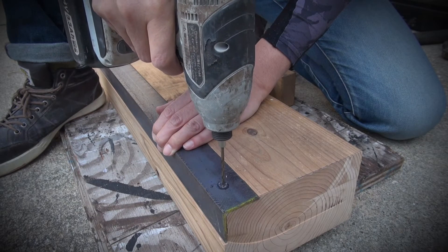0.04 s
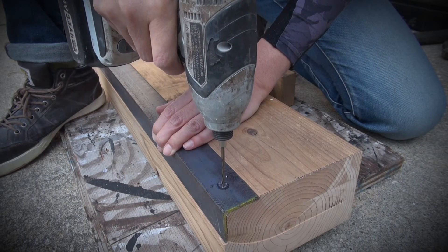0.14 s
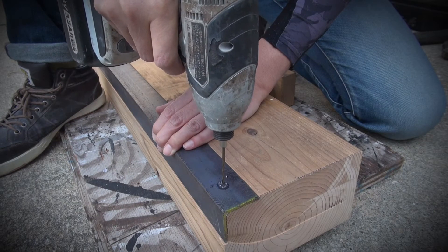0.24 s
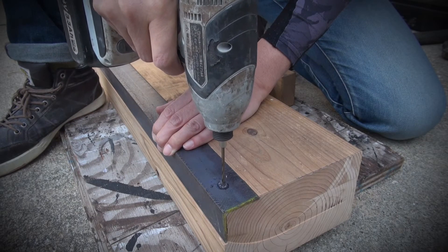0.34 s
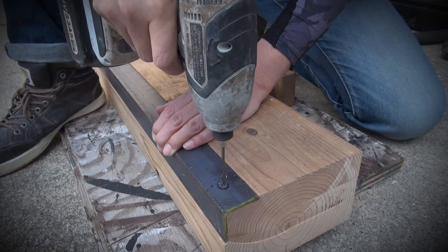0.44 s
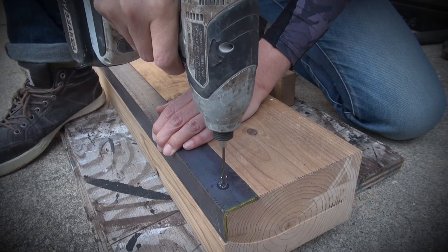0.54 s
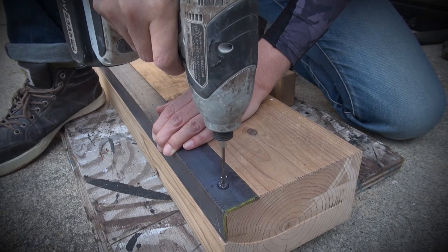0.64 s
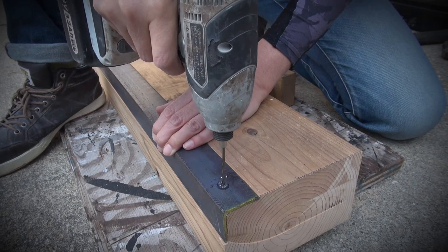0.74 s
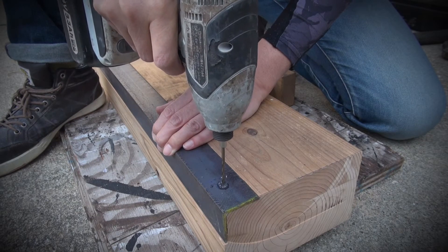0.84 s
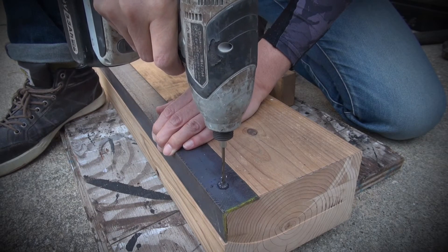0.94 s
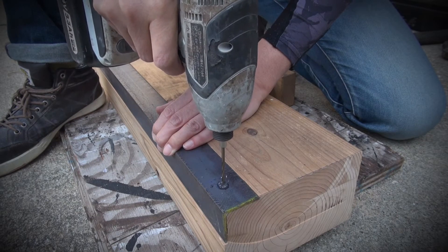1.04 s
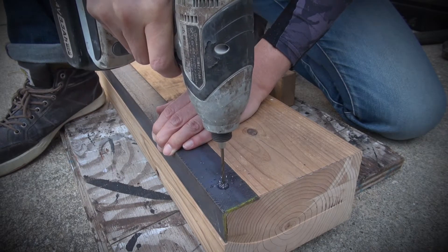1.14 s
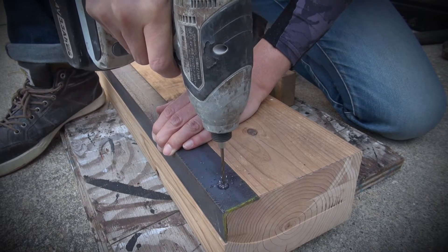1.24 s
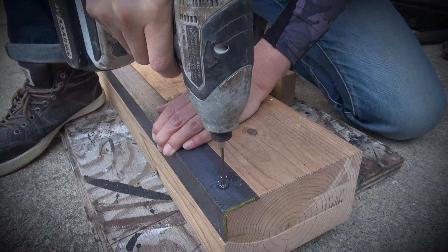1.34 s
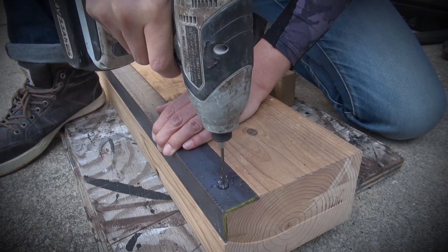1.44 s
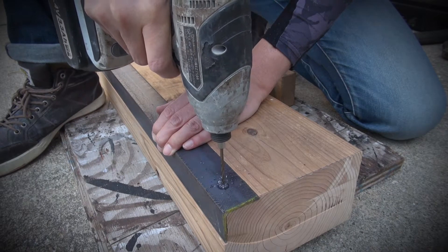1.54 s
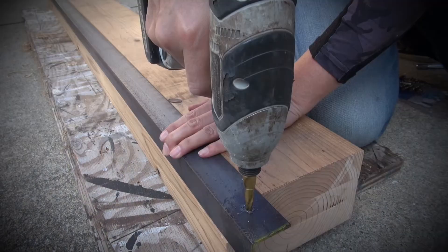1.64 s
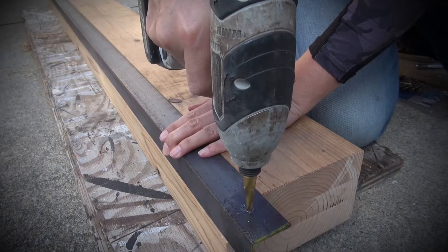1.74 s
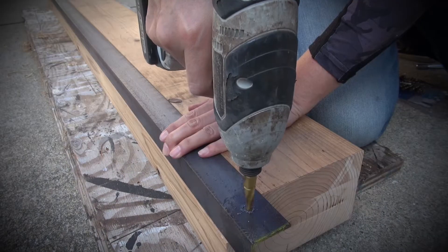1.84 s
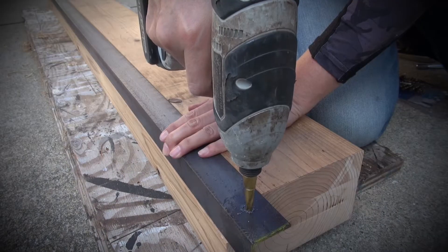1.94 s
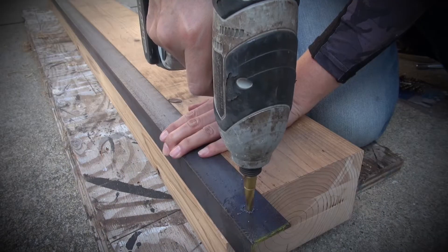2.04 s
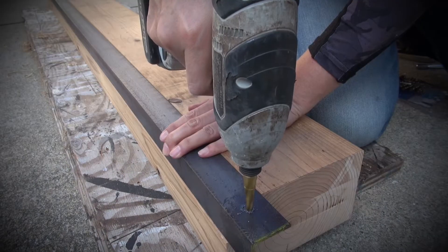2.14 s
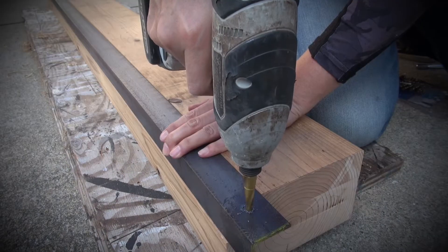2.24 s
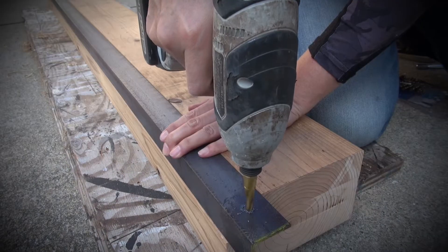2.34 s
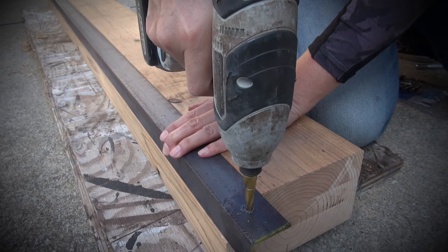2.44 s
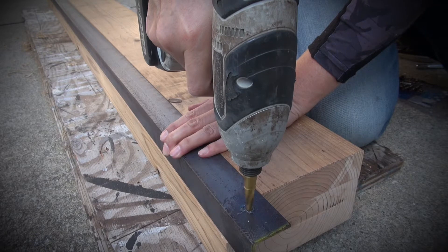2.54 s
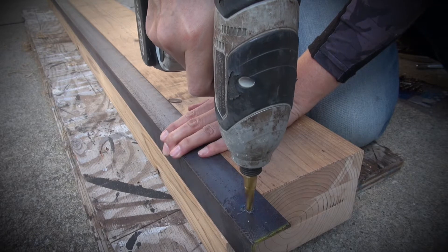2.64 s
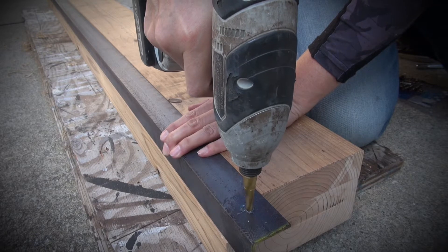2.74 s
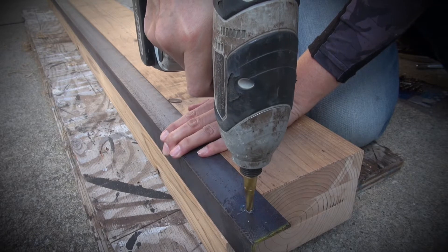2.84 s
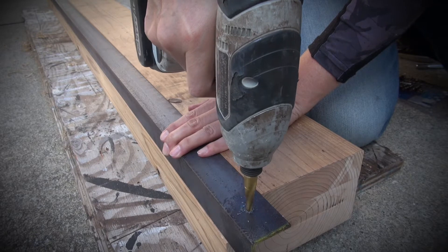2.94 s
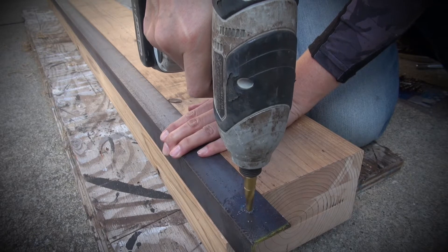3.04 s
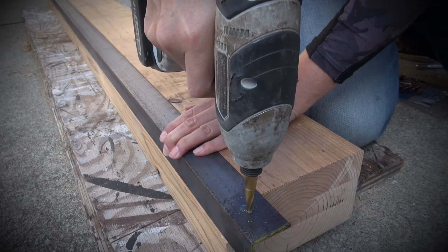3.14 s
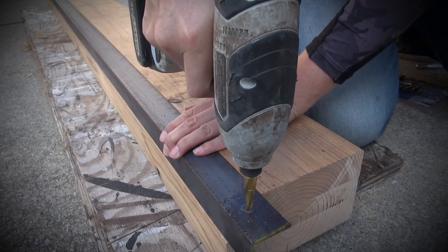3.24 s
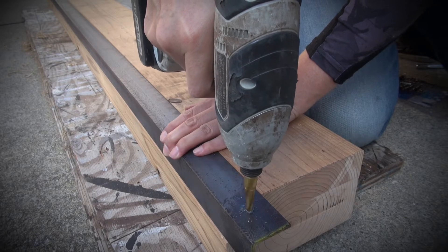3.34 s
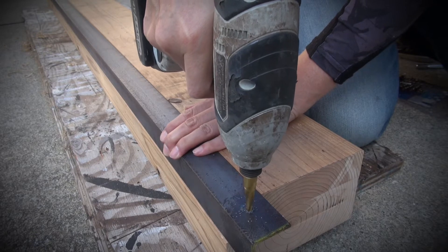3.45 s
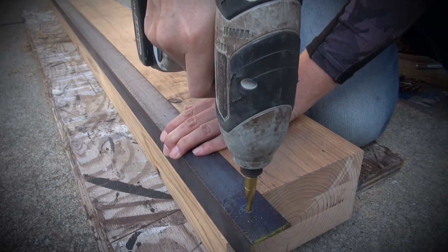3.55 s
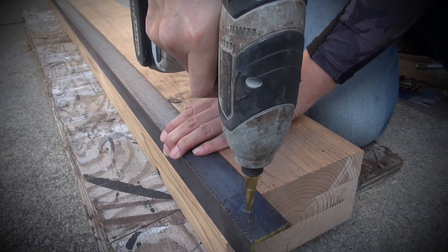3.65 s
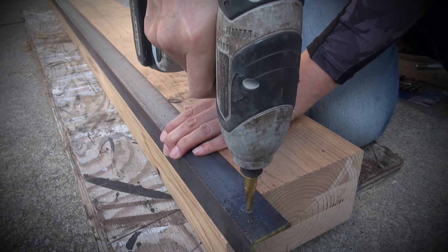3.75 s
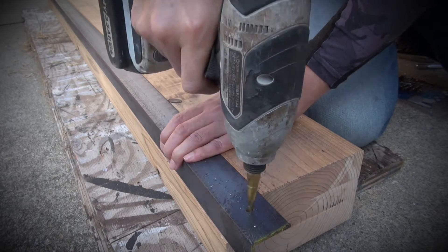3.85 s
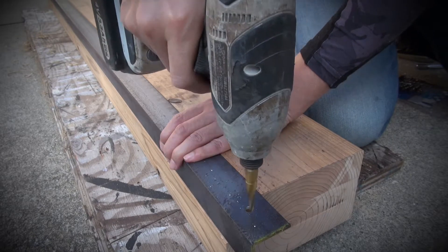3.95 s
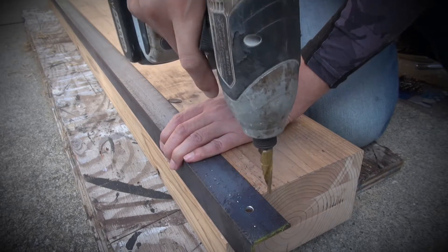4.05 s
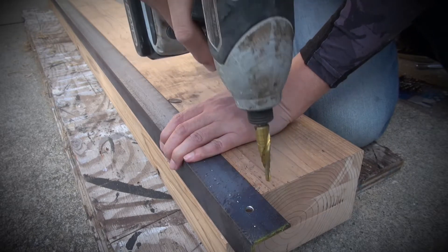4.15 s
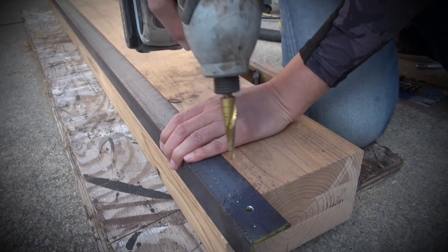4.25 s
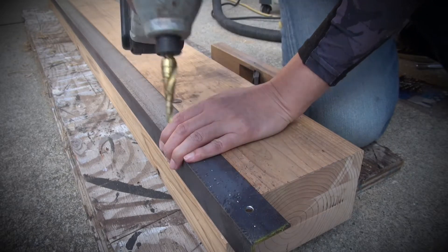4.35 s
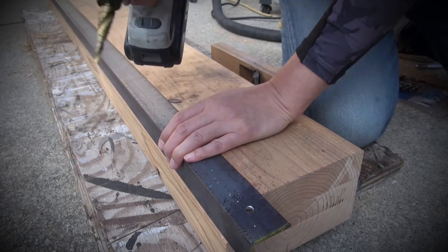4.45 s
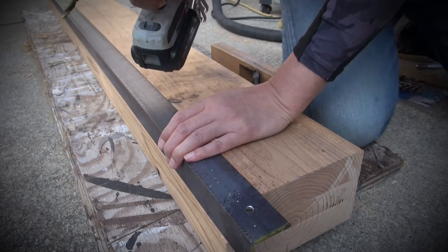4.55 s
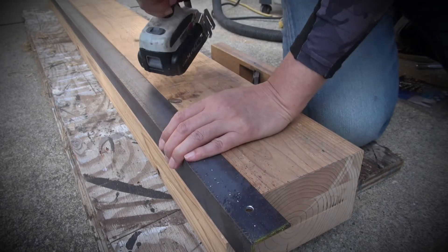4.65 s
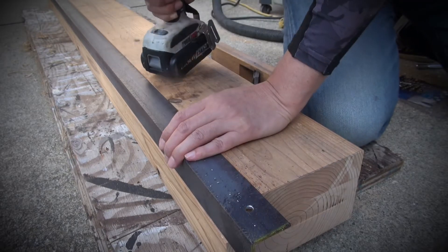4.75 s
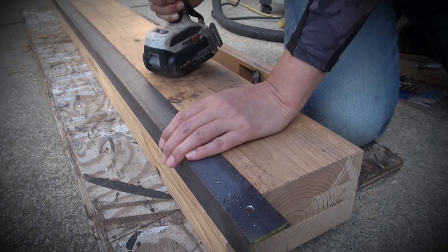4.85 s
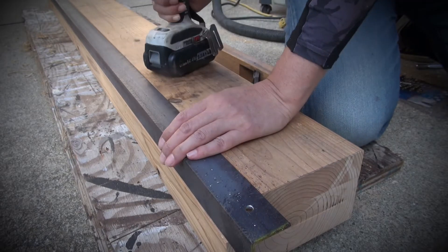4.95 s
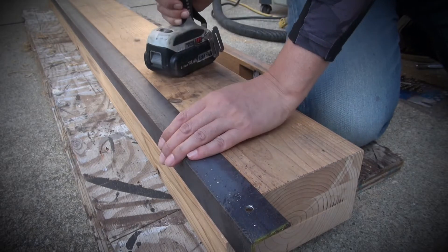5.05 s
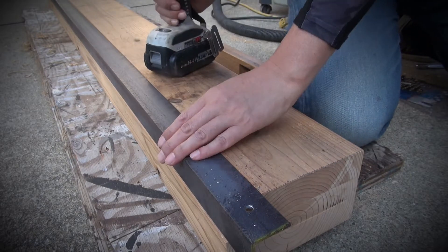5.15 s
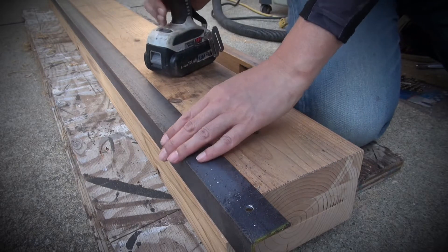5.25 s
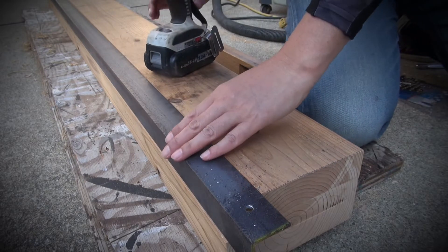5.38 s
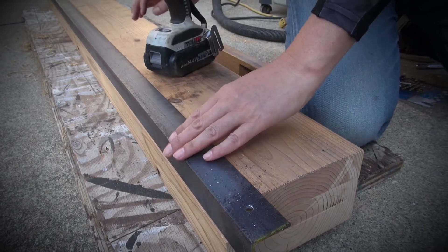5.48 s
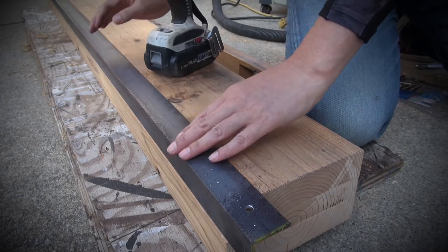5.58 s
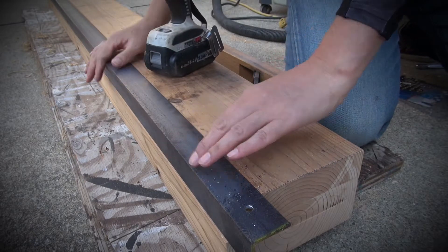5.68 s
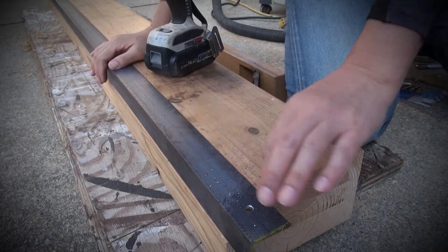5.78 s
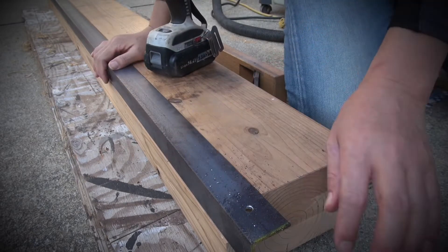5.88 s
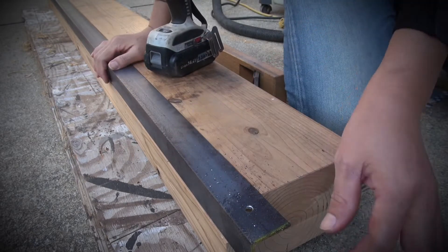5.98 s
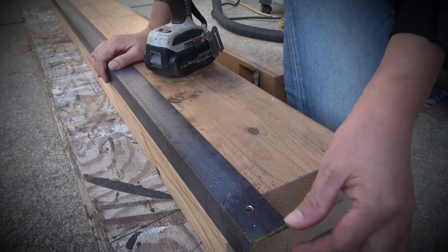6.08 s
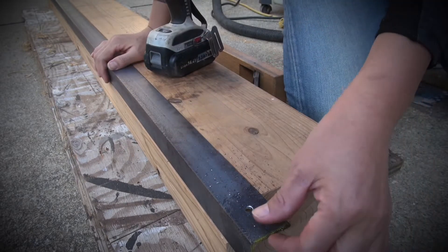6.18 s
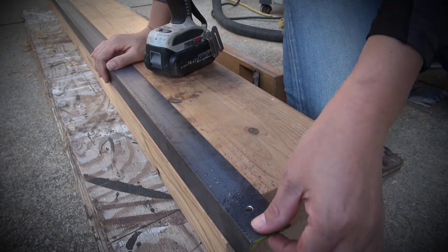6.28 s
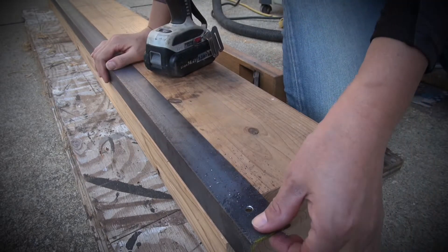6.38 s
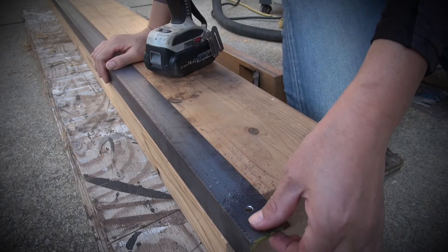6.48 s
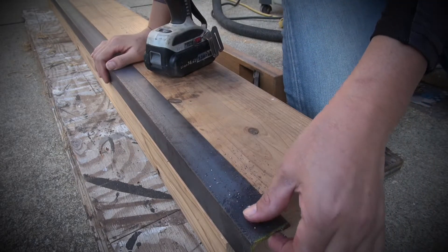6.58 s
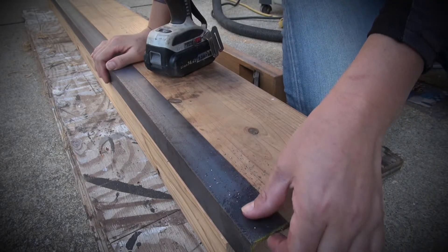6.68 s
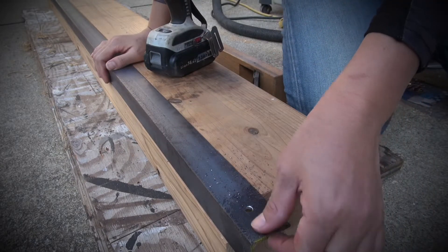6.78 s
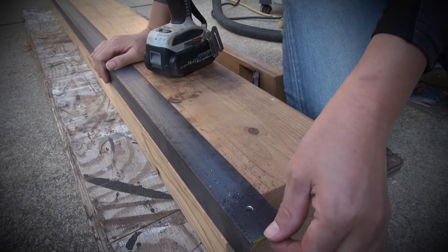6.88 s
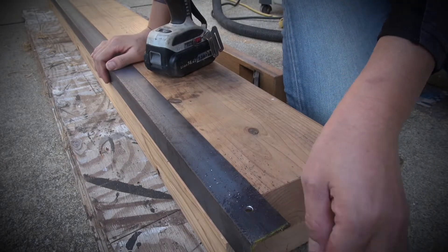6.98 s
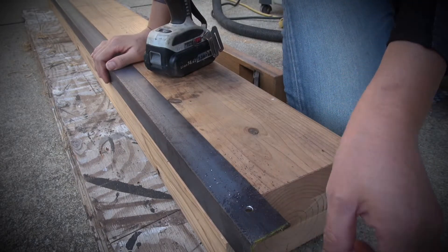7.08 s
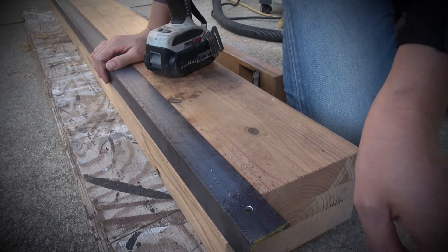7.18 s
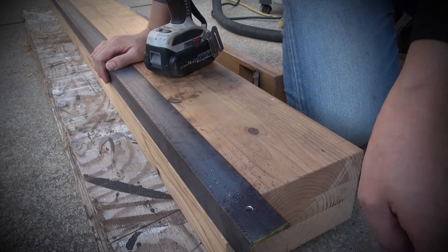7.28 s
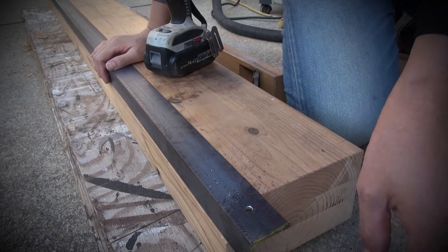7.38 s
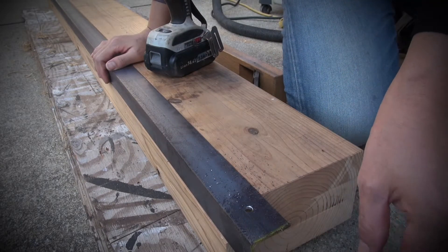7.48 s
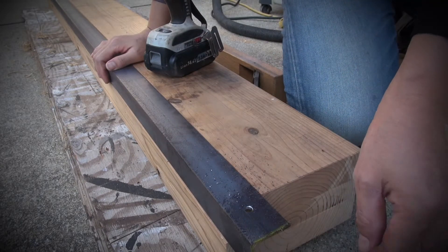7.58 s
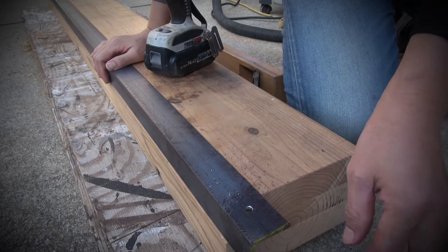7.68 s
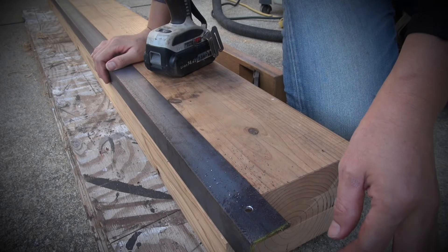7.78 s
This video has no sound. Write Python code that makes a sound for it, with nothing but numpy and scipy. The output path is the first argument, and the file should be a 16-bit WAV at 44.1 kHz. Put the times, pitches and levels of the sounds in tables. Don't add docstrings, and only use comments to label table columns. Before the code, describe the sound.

From 0 to 1.6 seconds a cordless drill runs loud and close, a clear, high gear whine around 1.8 kHz with bright harmonics, sagging slightly over a low cutting noise. At 1.6 an abrupt cut starts a fresh run-up, climbing for about a third of a second into a rougher, loaded whine. The bit rasps on steel, the timber shudders, most strongly near 3.2, and the plate rings in uneven bursts. Between 3.7 and 4.0 hard rasping grabs break through; the motor brakes abruptly with a jolt and click. At 4.7 to 5.0 the drill lands on timber with cracks, hollow knocks and bright chuck jingles, a short room echo behind. Afterwards it is quiet: soft hand rustling, sparse light taps, tiny high squeaks at 6.2 to 6.5, and faint air and distant low rumble, swelling around 6 and lingering to about 7.8.

```python
import sys
import numpy as np
from scipy import signal
from scipy.fft import rfft, irfft, next_fast_len
from scipy.io import wavfile
from scipy.ndimage import uniform_filter1d, map_coordinates

SR = 44100
rng = np.random.default_rng(int(sys.argv[2]) if len(sys.argv) > 2 else 0)


def volts_from_decibels(level):
    exponent = np.asarray(level, float) / 20
    return 10 ** exponent


def generate_wav(signal):
    frames = np.transpose(np.atleast_2d(signal))
    scaled = np.clip(frames, -1, 1) * 32767
    pcm = np.round(scaled).astype(np.int16)
    wavfile.write(sys.argv[1], SR, pcm)


N = 344862
CHANGE_S = 1.635
TEETH, MOTOR = 50, 8.286

# t/s, f/Hz
PILOT_SPEED = [(0, 1812), (.06, 1820), (.12, 1799), (.17, 1802), (.24, 1791), (.4, 1790), (.45, 1807),
               (.52, 1792), (.64, 1775), (.73, 1794), (.86, 1795), (.92, 1776), (.97, 1781), (1.04, 1773),
               (1.08, 1751), (1.2, 1744), (1.36, 1751), (1.635, 1752)]
# f/Hz, level/dB per Hz
PILOT_BODY = [(150, -49), (250, -27.5), (743, -17.5), (868, -17), (1620, -8), (1760, -6.5), (1960, -12.5),
              (2910, -11.5), (3650, -3), (3910, -5), (7280, -3.5), (9440, -21), (11800, -12.5),
              (15600, -37)]
# f/Hz, level/dB per Hz
PILOT_CUTTING = [(120, -58), (200, -24), (287, -6), (550, -24), (644, -9), (1200, -3), (1560, -25),
                 (2640, -120)]


def pilot():
    t = np.arange(N) / SR
    mesh_hz, = curves(PILOT_SPEED)
    whine = gearbox(mesh_hz, clear_lines, jitter=0.12, throb_db=0.8, body=PILOT_BODY)
    cutting_db = -30 + 10 * np.exp(-t / 0.2) + 0.88 * wobble(7.5)
    cutting = volts_from_decibels(cutting_db) * drill_rush(shaped(PILOT_CUTTING), patchy_db=-3)
    balance_db = np.array([[0.15], [-0.15]])
    grind = volts_from_decibels(-31.5 + 0.31 * wobble(6.5) + balance_db)
    return grind * (whine + cutting) * between(-1, CHANGE_S, 0.02)


# spindle order, level/dB at light load, level/dB pressed, place/turn
RING_LINES = [(46, -28, -28, .25), (47, -31, -26, .25), (48, -18.5, -20, .25), (49, -31, -26, .25),
              (50, -12, -14, .25), (51, -22, -19, .25), (52, -17.5, -16, .25), (100, -25, -18, 0),
              (99, -30, -20, 0), (101, -21, -16, 0), (102, -15, -13, 0), (103, -17, -14, 0),
              (104, -13, -13, 0), (105, -19, -17, 0), (106, -19, -16, 0), (107, -23, -20, 0),
              (108, -23, -20, 0), (151, -19, -21, .78), (152, -19, -19, .78), (153, -23, -22, .78),
              (154, -13, -13, .78), (155, -23, -20, .78)]
# motor order, level/dB at light load, level/dB pressed
ARMATURE = [(12, -8, -16), (18, -12, -15), (23, -21, -19), (24, -22, -19), (30, -27, -28)]


def clear_lines(spindle, shake):
    planets_line_up_s = 1.578
    turn = spindle - spindle[round(planets_line_up_s * SR)]
    pressed = between(1.06, 9, 0.06)

    def level(light_db, pressed_db):
        return volts_from_decibels(light_db + (pressed_db - light_db) * pressed)

    gears = sum(level(light_db, pressed_db) * np.cos(k * (turn - 2 * np.pi * place + shake / TEETH))
                for k, light_db, pressed_db, place in RING_LINES)
    motor = sum(level(light_db, pressed_db) * volts_from_decibels(2.8 * wobble(18.2))
                * np.sin(k * (MOTOR * turn + 0.1 * shake)) for k, light_db, pressed_db in ARMATURE)
    return gears * volts_from_decibels(0.64 * wobble(24.7)) + motor


# t/s, effort level/dB, bite of the edge/dB
EFFORT = [(1.64, -32.5, 0), (2.6, -32.5, 1.5), (2.95, -32, 2), (3.09, -33, 1), (3.13, -33.5, -1.5),
          (3.29, -33, -2), (3.34, -33.5, -1.5), (3.54, -32, -1), (3.6, -32, -3.5), (3.795, -32.5, -2),
          (3.803, -29, -0.5), (3.88, -30, -2), (3.94, -28, -2), (3.97, -29.5, -7), (4.004, -25.5, -6)]
# f/Hz, level/dB per Hz
STEP_BODY = [(1650, -32.5), (2800, -6), (3810, 1.5), (4730, -1.5), (5120, -2), (6130, -0.5), (7070, 0.5),
             (9630, -17.5), (11000, -11), (11600, -11.5), (15600, -32)]
# f/Hz, level/dB
TONE_PATH = [(1080, -20), (1280, -8), (1500, -17), (1700, -17), (1850, -13), (2500, -21), (3000, -15),
             (3350, -11), (3500, -14), (3680, -13), (3850, -8), (4280, -9),
             (4500, -16), (5100, -13), (5600, -9)]
# f/Hz, level/dB per Hz
RASP = [(410, -26.5), (700, 0.5), (735, -3), (893, -2.5), (1640, -0.5), (1870, -4.5), (2020, 1.5),
        (3000, -2), (3900, -46), (6600, -120)]
# t/s, f/Hz, level/dB, t60/s
BIT = (4.04, 9829, -80, 1)


def stepped():
    t = np.arange(N) / SR
    effort_db, bite_db = curves(EFFORT)
    fade_db = 317 * np.maximum(t - 4.004, 0)
    grind_db = effort_db - fade_db + 0.5 * wobble(12)
    mesh_hz = step_speed()
    load = between(1.95, BRAKE_S, 0.03)
    hush_db = 500 * np.maximum(t - 4.015, 0)
    free_db = 4.5 * (1 - load)
    tone_db = [along(TONE_PATH, k * mesh_hz) + free_db - hush_db for k in (1, 2, 3)]
    tone_db[1] = tone_db[1] + 3 * between(3.58, 9, 0.1)

    def sing(spindle, shake):
        return mesh_tones(spindle, shake, tone_db, wander=0.15 + 0.25 * load, depth=0.25 + 0.2 * load)

    whine = gearbox(mesh_hz, sing, jitter=0.14, throb_db=0.6, body=STEP_BODY)
    rasp_db = -7.5 + bite_db + 1.4 * wobble(120) + 0.42 * wobble(35) + 0.47 * wobble(13)
    rasp = volts_from_decibels(rasp_db) * drill_rush(shaped(RASP), patchy_db=1)
    shaken = chatter(grind_db, bite_db) + plate(grind_db, bite_db)
    start, hz, db, t60 = BIT
    bit = (t > start) * volts_from_decibels(db - 60 * np.abs(t - start) / t60) * np.sin(2 * np.pi * hz * t)
    drilling = volts_from_decibels(grind_db) * (whine + rasp) + shaken * between(0, BRAKE_S, 0.039)
    return drilling * between(CHANGE_S, 4.07, 0.0079) + bit


# t/s, f/Hz
STEP_SPEED = [(1.97, 1775), (2.05, 1830), (2.2, 1860), (2.3, 1850), (2.4, 1826), (2.55, 1845), (2.8, 1790),
              (2.9, 1720), (2.96, 1690), (3.17, 1674), (3.28, 1692), (3.33, 1735), (3.45, 1728),
              (3.6, 1678), (3.65, 1632), (3.795, 1620), (3.808, 1750), (3.91, 1800), (3.98, 1730)]
BRAKE_S = 3.982


def step_speed():
    t = np.arange(N) / SR
    run_up_hz = 990 + 2330 * np.maximum(t - CHANGE_S, 0)
    loaded_hz, = curves(STEP_SPEED)
    braked_hz = 20000 * np.maximum(t - BRAKE_S, 0)
    return np.maximum(np.minimum(run_up_hz, loaded_hz) - braked_hz, 200)


PLANETS = [(1, .6, .5, .28), (2, 1.1, .1, .03), (3, 1.1, .4, .2), (4, .8, .6, .15)]


def mesh_tones(spindle, shake, tone_db, wander, depth):
    fourth_db = np.minimum(tone_db[2], -13) - 1.5
    tones = 0
    for (k, upper, lower, place), db in zip(PLANETS, tone_db + [fourth_db]):
        angle = spindle - 2 * np.pi * place
        planets = np.exp(2j * angle)
        swell = np.exp(depth * (upper * planets + lower / planets) + wander * np.cos(angle))
        mesh = swell * volts_from_decibels(wobble(25)) * np.exp(1j * k * (TEETH * spindle + shake))
        tones = tones + volts_from_decibels(db) * unit(mesh.real)
    return filtered(tones, lambda hz: volts_from_decibels(0.84 * housing(hz) - 4))


# motor order, level/dB
MOTOR_ORDERS = [(1, -36), (3, -23), (4, -21.5)]


def gearbox(mesh_hz, sing, jitter, throb_db, body):
    spindle = 2 * np.pi * np.cumsum(mesh_hz / TEETH) / SR
    shake = jitter * (wobble(20) + 0.5 * wobble(150))
    hum = sum(volts_from_decibels(db - 2.5 + 1.5 * wobble(15)) * np.sin(k * MOTOR * spindle + 0.25 * k * shake)
              for k, db in MOTOR_ORDERS)
    noise = drill_rush(lambda hz: volts_from_decibels(along(body, hz) + housing(hz)), patchy_db=1)
    turns = np.cos(2 * spindle - 1) + 1.44 * np.cos(4 * spindle) + 0.5 * np.cos(spindle)
    throb = volts_from_decibels(throb_db * turns + 0.31 * wobble(39.9))
    return hum + sing(spindle, shake) + noise * unit(throb)


# f/Hz, width/Hz, lift/dB
HOUSING = [(3700, 240, 1), (4310, 150, 2), (5010, 780, 2.5), (6700, 320, 1), (2420, 240, -0.5)]


def housing(hz):
    return sum(db / (1 + (2 * (hz - centre) / width) ** 2) for centre, width, db in HOUSING)


# t/s, rise/s, fall/s, level/dB
SHUDDERS = [
    (1.8, .15, 0.077, -50),
    (2.1, 0.17, 0.099, -53.5),
    (3.23, 0.18, 0.12, -48),
    (3.168, .012, .015, -41),
    (3.21, .01, .012, -43),
    (3.232, .01, .012, -41),
    (3.26, 0.013, .015, -40.5),
    (3.3, .015, .015, -45),
    (3.378, .015, 0.014, -46),
]
# f/Hz, level/dB per Hz
STEP_CHATTER = [(170, -40), (260, 2), (400, 6), (700, 0.5), (1100, -20), (1600, -35)]


def chatter(grind_db, bite_db):
    shake = volts_from_decibels(grind_db - 19 + 0.86 * bite_db) + strokes(SHUDDERS, rest_db=-99)
    flutter = volts_from_decibels(0.85 * wobble(30.08) + 0.78 * wobble(12))
    return shake * flutter * drill_rush(shaped(STEP_CHATTER), patchy_db=1)


# t/s, level/dB
PLATE_BURSTS = [(1.69, -44.5), (1.76, -41.5), (1.83, -50), (1.98, -46), (2.05, -51), (2.13, -41.5),
                (2.23, -38.5), (2.33, -47), (2.49, -43), (2.56, -46.5), (2.63, -40), (2.75, -42.5),
                (2.82, -45), (2.88, -46), (2.94, -53), (3.1, -42.5), (3.49, -46.5), (3.91, -49),
                (3.95, -46)]


def plate(grind_db, bite_db):
    plate_hz, width_hz = 607, 26
    band = drill_rush(lambda hz: 1 / (1 + (2 * (hz - plate_hz) / width_hz) ** 2) ** 0.69, patchy_db=2.5)
    steady = band * volts_from_decibels(grind_db - 21.5 + 2.9 * bite_db)
    rise_hz = np.interp(np.arange(N) / SR, [CHANGE_S, 2.6], [587, plate_hz])
    note_hz = rise_hz + 7.6 * wobble(25)
    note = np.sqrt(2) * volts_from_decibels(2.4 * wobble(40)) * np.sin(2 * np.pi * np.cumsum(note_hz) / SR)
    bursts = strokes([(s, 0.04, 0.045, db) for s, db in PLATE_BURSTS], rest_db=-99)
    return steady + bursts * note


# t/s, peak level/dB, low part level/dB
GRABS = [
    (3.7364, -25, -25),
    (3.8018, -21, -6),
    (3.813, -23, -6),
    (3.8444, -21, -20),
    (3.901, -13.5, -3),
    (3.9537, -19, -20),
    (3.9774, -32, -22),
    (3.9994, -27, -36),
    (4.024, -17, -6.5),
]


def grabs():
    t = np.arange(SR // 12) / SR
    high, low = np.zeros(N + SR), np.zeros(N + SR)
    for s, db, low_db in GRABS:
        burst = volts_from_decibels(db - 11.5 - 60 * t / 0.11) * (1 - np.exp(-t / 0.0013))
        high[round(s * SR):][:len(t)] += burst
        low[round(s * SR):][:len(t)] += burst * volts_from_decibels(low_db)
    band = [(350, -32), (600, -6), (1100, 7), (1900, 3), (2800, -25)]  # f/Hz, level/dB per Hz
    rasp = high[:N] * drill_rush(shaped(STEP_BODY), patchy_db=2.2)
    return rasp + low[:N] * drill_rush(shaped(band), patchy_db=2.3)


# t/s, tick level/dB, timber knock level/dB
BRAKE_CLICKS = [
    (4.047, -22.5, -25),
    (4.0718, -40, -6),
]
# t/s, tick level/dB, timber knock level/dB
TAPS = [(4.7158, -44, 0), (4.843, -47, -4), (4.7183, -25, 2), (4.8457, -22, -1), (4.8674, -42, -4),
        (4.8894, -45, -3), (4.9504, -50.5, 12.5), (4.9538, -50, 12.5), (5.033, -44.5, -6),
        (5.0459, -43, -6), (5.0574, -51, -7), (5.1267, -50, -4), (5.1428, -47, 0), (5.1861, -56, 5),
        (5.2494, -55, 8), (5.7284, -49, -10), (5.7743, -50, 1), (5.875, -47, -1), (6.2444, -52, -5),
        (6.4994, -55.5, 5), (6.7644, -57, 1), (7.2094, -51, -4.5)]
# t/s, tick level/dB, sleeve ring level/dB
JINGLES = [(4.0486, -43.5, -18), (4.085, -62, -18), (4.106, -62, -18), (4.1854, -53, -22),
           (4.4594, -57, -34), (4.5101, -53, -36), (4.7374, -38.5, -27), (4.7466, -40.5, -21),
           (4.8544, -32, -21), (4.8811, -39.5, -10), (4.9144, -53, -24), (4.9606, -34.5, -17),
           (4.9674, -42, -7), (4.9764, -56, -20)]
# f/Hz, level/dB, t60/s
KNOCK = [(330, -13, .04), (470, -9, .025), (660, -4, .04), (780, -1, .02), (950, -4, .015),
         (1200, -3, .015), (1390, -4, .02), (3250, -9, .025), (4500, -14, .025)]
# f/Hz, level/dB, t60/s
JAWS = [(7484, -4, 0.045), (7710, 0.5, 0.054), (8260, -9, 0.035)]
# f/Hz, level/dB, t60/s
SLEEVE = [(13280, 6, 0.04), (14760, -7, .04)]
# f/Hz, level/dB per Hz
SHELL = [(1290, -19), (2200, -0.5), (2680, -6.5), (2980, -1), (3450, -8), (4200, -2), (5880, -8.5),
         (6590, -8), (8020, -11), (9610, -27), (15600, -30)]
# f/Hz, level/dB per Hz
TIMBER = [(200, -26), (450, -4), (720, 5.5), (1000, -2.5), (1330, -1.5), (2000, -15), (2600, -37)]
# f/Hz, level/dB per Hz
SNAP = [(5000, -20), (7000, 0), (11000, -3), (15600, -8)]


def contacts():
    t = np.arange(SR // 2) / SR
    case, timber, chuck, snap = np.zeros((4, N + SR))
    rise = 1 - np.exp(-t / 0.00068)
    taps = [(s, db, knock_db, -30, -39) for s, db, knock_db in BRAKE_CLICKS + TAPS]
    jingles = [(s, db, -5, -3.5, sleeve_db) for s, db, sleeve_db in JINGLES]
    for s, db, knock_db, jaw_db, sleeve_db in taps + jingles:
        at = slice(round(s * SR), round(s * SR) + len(t))
        case[at] += volts_from_decibels(db - 2.5 - 60 * t / 0.027) * rise
        timber[at] += volts_from_decibels(db + knock_db - 5.5 - 60 * t / 0.044) * rise
        chuck[at] += volts_from_decibels(db + knock_db - 0.9) * rise * ring(KNOCK, t, rough=0.063)
        chuck[at] += volts_from_decibels(db + jaw_db - 1) * rise * ring(JAWS, t, rough=0.048)
        chuck[at] += volts_from_decibels(db + sleeve_db + 0.5) * rise * ring(SLEEVE, t, rough=0.02)
    for s, db, _ in JINGLES:
        snap[round(s * SR):][:len(t)] += volts_from_decibels(db - 17 - 60 * t / 0.011)
    dull = case[:N] * bench_rush(shaped(SHELL), patchy_db=2.9)
    dull = dull + timber[:N] * bench_rush(shaped(TIMBER), patchy_db=2)
    sharp = snap[:N] * bench_rush(shaped(SNAP), patchy_db=1.5)
    return (dull + chuck[:N] + sharp) * volts_from_decibels([[0.4], [-0.4]])


def ring(modes, t, rough):
    blur = rough * np.cumsum(rng.standard_normal(len(t)))
    strength_db = rng.normal(0, 2, len(modes))
    return sum(volts_from_decibels(db + extra_db - 60 * t / t60) * np.sin(2 * np.pi * hz * t + blur)
               for extra_db, (hz, db, t60) in zip(strength_db, modes))


# t/s, rise/s, fall/s, level/dB
SWEEP = [(4.45, 0.2, .4, -72), (4.88, 0.37, 0.32, -67), (5.25, .08, .05, -69), (5.39, 0.12, .04, -66),
         (5.57, .06, 0.22, -65), (5.71, 0.34, .03, -63.5), (5.86, .15, 0.46, -72),
         (6.25, 0.13, 0.37, -70.5), (6.5, .06, .06, -72), (6.762, .006, 0.13, -64), (6.8, .02, .04, -64.5),
         (7.2, .01, .05, -70), (7.37, .08, .02, -76), (7.54, .04, .15, -78), (7.76, .06, .1, -76)]
# f/Hz, level/dB per Hz
RUSTLE = [(1760, -38.5), (3000, -16.5), (3140, -7), (4030, -3), (4500, -2), (6830, -2.5), (8370, -7),
          (9350, -19.5), (12100, -10), (14300, -26)]
# t/s, rise/s, fall/s, level/dB
SQUEAK = [
    (6.2, .03, .03, -70),
    (6.242, .008, .012, -63),
    (6.287, .01, .01, -63),
    (6.3, .01, .03, -65),
    (6.356, .012, .018, -59),
    (6.42, .03, .02, -73),
    (6.5, .02, .012, -68),
]
# f/Hz, level/dB per Hz
SCRAPE = [(4400, -25), (5000, -3), (5300, 0), (5900, -4), (6500, -25)]


def hand():
    t = np.arange(N) / SR
    rub = strokes(SWEEP, rest_db=-84) * volts_from_decibels(3 + 0.99 * wobble(60) + 0.38 * wobble(15))
    rustle = rub * bench_rush(shaped(RUSTLE), patchy_db=1.5)

    def slip(hz, drift_hz):
        drift = drift_hz * np.cumsum(0.69 * wobble(40) + 2 * wobble(500)) / SR
        return volts_from_decibels(3.5 * wobble(121.27)) * np.sin(2 * np.pi * (hz * t + drift))

    scrape = 0.5 * bench_rush(shaped(SCRAPE), patchy_db=2.5)
    squeak = strokes(SQUEAK, rest_db=-99) * (slip(5230, 25) + scrape) + volts_from_decibels(-82) * slip(11800, 170)
    return rustle * between(3, 9, 0.05) + squeak * between(6.12, 6.51, 0.03)


# t/s, level/dB
RUMBLE = [(0, -61.5), (.4, -69.5), (1.62, -69.5), (1.66, -59), (2.1, -60.5), (2.4, -65), (3, -60),
          (4.45, -61), (4.8, -56.5), (5.2, -55.5), (5.7, -51.5), (6.05, -45), (6.7, -48), (7.02, -56),
          (7.2, -52), (7.82, -49.5)]
# f/Hz, level/dB per Hz
RUMBLE_TONE = [(35, -47), (60, -26), (84, -7), (102, 3.5), (118, 1), (135, -5.5), (172, 0), (260, -15.5),
               (340, -50), (570, -120)]
# f/Hz, level/dB per Hz
DEEP = [(15, -22), (38, 6), (62, -8), (80, -46)]
# f/Hz, level/dB per Hz
LOW_AIR = [(120, -32), (200, -1), (269, -6), (387, -5.5), (645, -9), (900, -16), (1170, -47.5),
           (1980, -120)]
# f/Hz, level/dB per Hz
MID_AIR = [(410, -21), (700, -7), (912, -5.5), (1170, -10.5), (1300, -6.5), (1650, -7), (2150, -13),
           (3610, -18), (5280, -26.5), (9920, -39.5), (11500, -41), (14300, -45.5)]
# t/s, rise/s, fall/s, level/dB
DRONE = [
    (7.7, 0.11, 0.41, -63),
]


def workshop():
    t = np.arange(N) / SR
    traffic_db, = curves(RUMBLE)
    duck_db = -7 * np.exp(-np.maximum(t - 4.5, 0) / 0.72)
    low = volts_from_decibels(-57.5 + 0.6 * (traffic_db + 52)) + strokes(DRONE, rest_db=-99)
    rumble = volts_from_decibels(traffic_db - 0.5 + 0.6 * wobble(14)) * bench_rush(shaped(RUMBLE_TONE), patchy_db=0)
    low_air = low * volts_from_decibels(3) * bench_rush(shaped(LOW_AIR), patchy_db=1.3)
    mid_air = volts_from_decibels(-55 + duck_db) * bench_rush(shaped(MID_AIR), patchy_db=0.75)
    deep = volts_from_decibels(np.linspace(-79, -70, N)) * bench_rush(shaped(DEEP), patchy_db=3)
    return rumble + deep + (low_air + mid_air) * volts_from_decibels(-8 * between(-1, CHANGE_S, 0.012))


# f/Hz, t60/s
WALLS = [(300, 0.15), (3000, 0.27), (12000, 0.24)]


def room(x):
    hz, t, z = signal.stft(rng.standard_normal((2, SR // 3)), SR, nperseg=256)
    decay = volts_from_decibels(-60 * t / along(WALLS, hz)[:, None])
    tail = signal.istft(z * decay, SR, nperseg=256)[1]
    delayed = np.pad(x, (300, 0))[None]
    return signal.fftconvolve(delayed, tail / np.linalg.norm(tail[0]), axes=1)[:, :N]


# f/Hz, side minus mid level/dB
DRILL_WIDTH = [(60, -18), (100, -6), (180, -9), (310, -24), (550, -12.5), (950, -20), (1650, -63),
               (2860, -53), (4970, -52), (8640, -11.5), (15000, -27)]


def drill_rush(gain, patchy_db):
    return rush(gain, DRILL_WIDTH, patchy_db)


# f/Hz, side minus mid level/dB
BENCH_WIDTH = [(60, -37), (130, -37), (290, -25), (640, -15), (1410, -13.5), (3100, -14.5), (6820, -15.5),
               (15000, -7)]


def bench_rush(gain, patchy_db):
    return rush(gain, BENCH_WIDTH, patchy_db)


def rush(gain, width, patchy_db):
    z = signal.stft(rng.standard_normal((2, N)), nperseg=512)[2]
    field = uniform_filter1d(rng.standard_normal(z.shape[1:]), size=5, axis=0)
    field = uniform_filter1d(field, size=6, axis=1)
    pair = signal.istft(z * volts_from_decibels(patchy_db * unit(field)), nperseg=512)[1][:, :N]
    mid, side = filtered(pair, lambda hz: gain(hz) * np.array([np.ones_like(hz), volts_from_decibels(along(width, hz))]))
    return unit(np.array([mid + side, mid - side]))


def shaped(spectrum):
    return lambda hz: volts_from_decibels(along(spectrum, hz))


def filtered(x, response):
    m = next_fast_len(N + SR // 2)
    return irfft(rfft(x, m) * response(np.fft.rfftfreq(m, 1 / SR)), m)[..., :N]


def strokes(rows, rest_db):
    t = np.arange(N) / SR
    swells_db = [db - 10 * np.maximum((s - t) / abs(rise), (t - s) / abs(fall)) for s, rise, fall, db in rows]
    return volts_from_decibels(np.maximum(np.max(swells_db, axis=0), rest_db))


def curves(rows):
    s, *columns = np.transpose(rows)
    return [np.interp(np.arange(N) / SR, s, column) for column in columns]


def between(start, end, fade):
    t = np.arange(N) / SR
    return np.clip(np.minimum(t - start, end - t) / fade + 0.5, 0, 1)


def wobble(rate):
    knots = rng.standard_normal(int(N * rate / SR) + 4)
    return map_coordinates(knots, [np.arange(N) * rate / SR])


def along(points, hz):
    f, value = np.transpose(points)
    return np.interp(np.log(hz + 1), np.log(f + 1), value)


def unit(x):
    return x / np.sqrt(np.mean(x ** 2) + 1e-20)


def scene():
    near = pilot() + stepped() + grabs()
    touches = filtered(contacts(), lambda hz: (1j * hz / (1j * hz + 190)) ** 2)
    echo = volts_from_decibels(-19) * room(near.mean(0)) + volts_from_decibels(-18.5) * room(touches.mean(0))
    return near + touches + echo + hand() + workshop()


def top_cut(x):
    return signal.sosfilt(signal.butter(12, 15770, fs=SR, output="sos"), x)


def record(dry):
    left, right = dry
    middle_and_side = np.array([left + right, left - right]) / 2
    mid, side = filtered(middle_and_side, lambda hz: np.array([hz < 15790, hz < 11000]))
    return top_cut(np.array([mid + side, mid - side]))


dry = scene()
out = record(dry)
generate_wav(out)
```